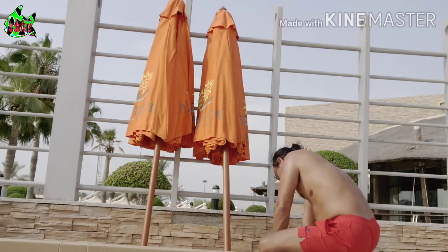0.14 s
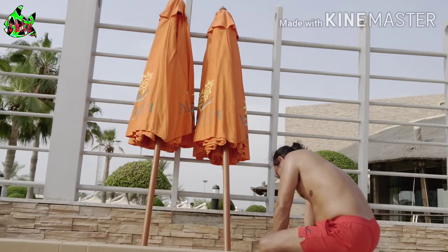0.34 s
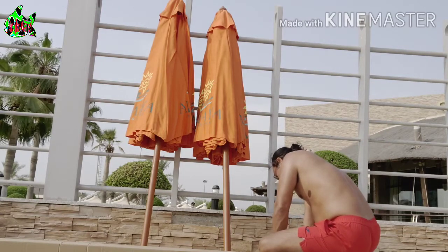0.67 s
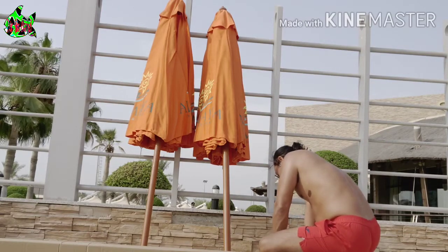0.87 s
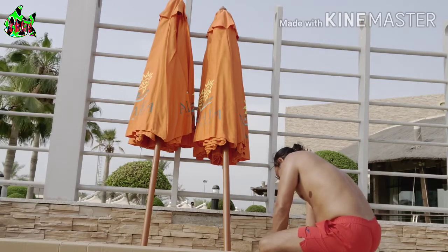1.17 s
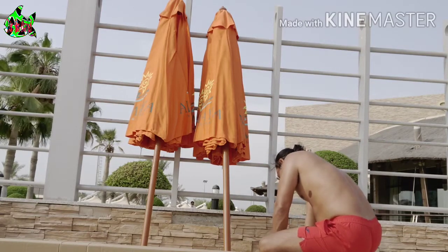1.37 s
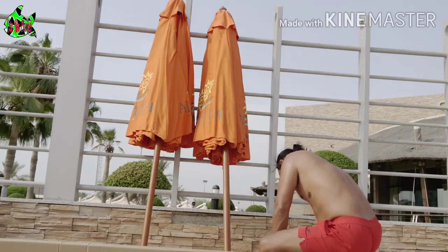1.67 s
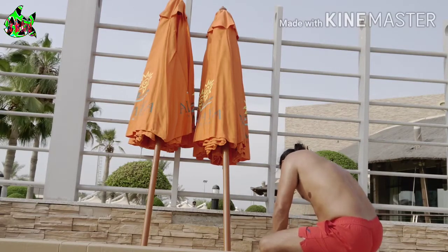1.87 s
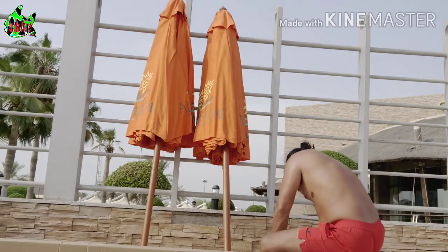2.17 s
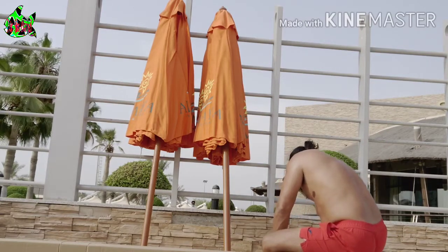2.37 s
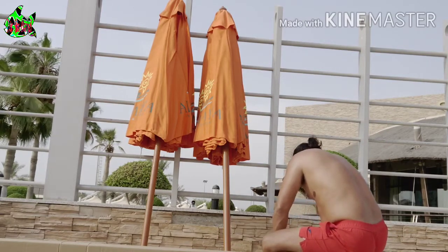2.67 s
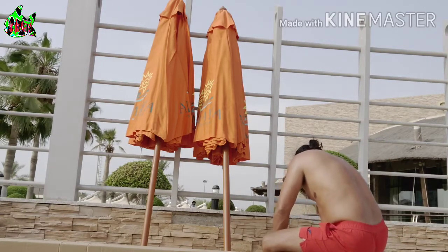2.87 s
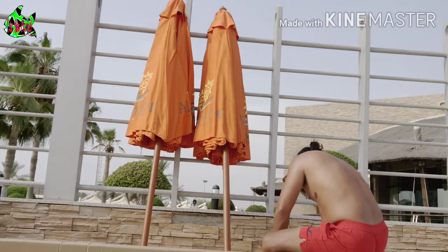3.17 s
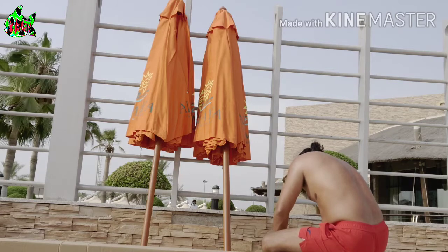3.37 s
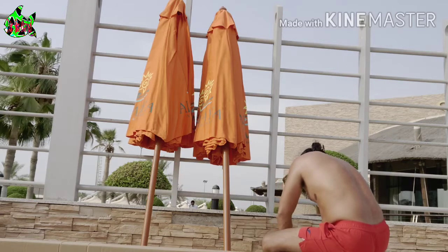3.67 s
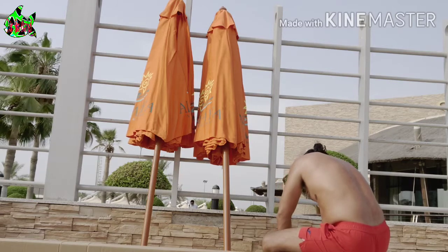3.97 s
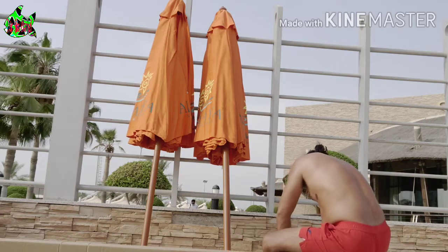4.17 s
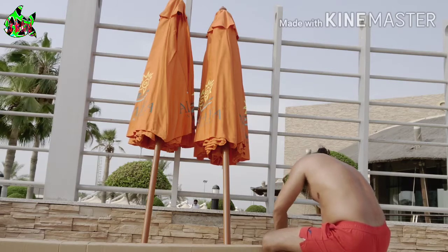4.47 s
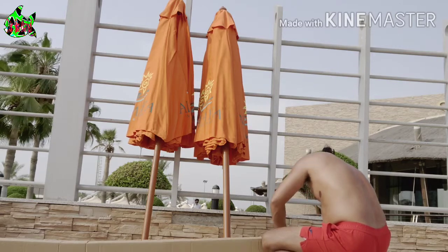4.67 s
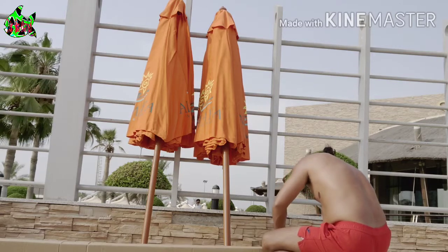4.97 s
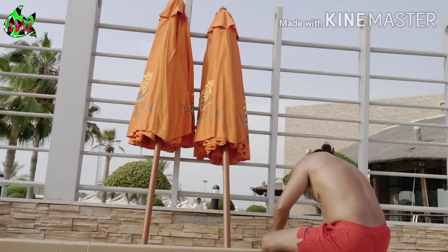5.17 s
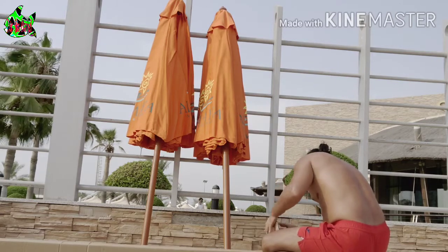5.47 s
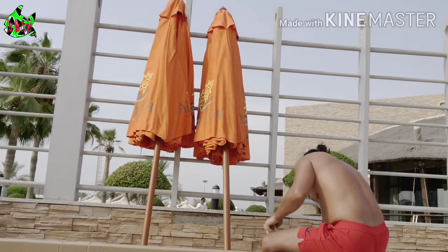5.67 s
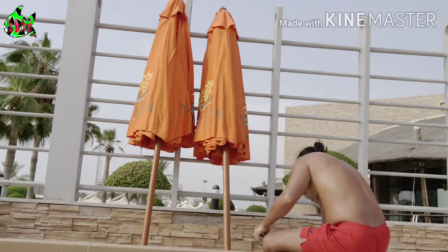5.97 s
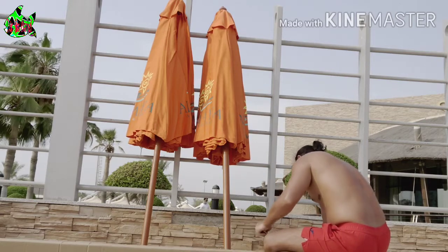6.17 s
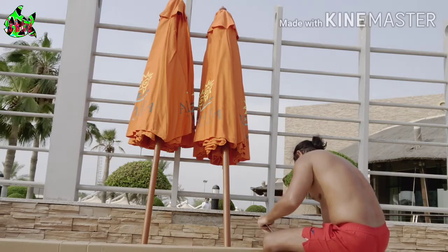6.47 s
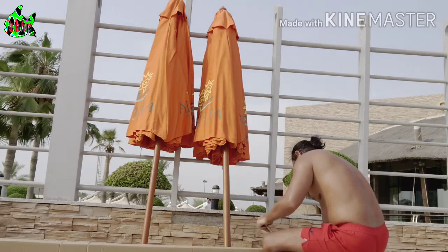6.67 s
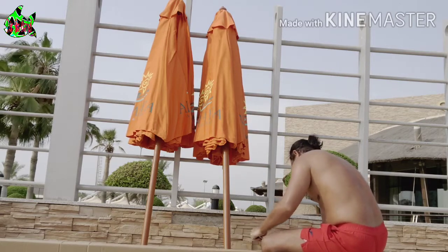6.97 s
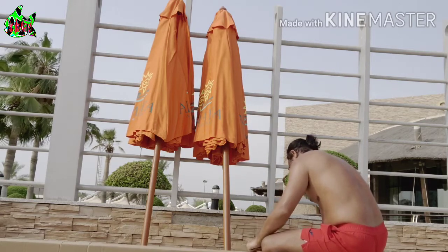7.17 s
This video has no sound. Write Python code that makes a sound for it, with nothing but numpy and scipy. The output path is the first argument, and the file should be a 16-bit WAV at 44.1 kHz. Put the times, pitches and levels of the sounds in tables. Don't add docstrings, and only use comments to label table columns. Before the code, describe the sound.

Someone handles the foot of a folded umbrella by a pool. Cloth swishes first, then a short gritty drag and a boomy hollow knock that rocks and settles at left. Small tool taps and clinks lead to a rapid run of dry stone ticks, then a woody double knock at centre. Low traffic rumble, gentle wind buffeting and faint pump hum continue throughout; the terrace returns a short, light echo.

```python
import sys
import numpy as np
from scipy import signal
from scipy.fft import rfft, irfft, dct, next_fast_len
from scipy.io import wavfile
from scipy.ndimage import uniform_filter1d

SR = 44100
rng = np.random.default_rng(int(sys.argv[2]) if len(sys.argv) > 2 else 0)


def store_wav(level_fs):
    pcm = np.round(np.clip(np.atleast_2d(level_fs), -1, 1) * 32767)
    wavfile.write(sys.argv[1], SR, pcm.T.astype(np.int16))


def invert_db(level):
    return 10 ** (np.asarray(level, dtype=float) / 20)


N = 323253
LAG_LEFT, LAG_MIDDLE, LAG_STREET = 17, -4, -15
PRE = 40


def read(points, hz):
    f, value = np.transpose(points)
    return np.interp(np.log(hz + 1), np.log(f + 1), value)


def evened(x):
    return x / np.sqrt(np.mean(x ** 2) + 1e-20)


def coloured(x, points):
    size = next_fast_len(N + 400)
    gain = invert_db(read(points, np.fft.rfftfreq(size, 1 / SR)))
    return irfft(rfft(x, size) * gain, size)[..., :N]


def band(x, lo_hz, hi_hz):
    sos = signal.butter(2, [lo_hz, min(hi_hz, SR * .49)], "band", fs=SR, output="sos")
    return signal.sosfilt(sos, x)


def slow(rate_hz):
    drift = band(rng.standard_normal(N), 0.079, rate_hz)
    return evened(signal.lfilter([1], [1, -np.exp(-2 * np.pi * rate_hz / SR)], drift))


def humps(rows):
    t = np.arange(0, N + 64, 64) / SR
    power = sum(invert_db(db) ** 2 * np.exp(-((t - s) / half) ** 4) for s, half, db in rows)
    return np.interp(np.arange(N) / SR, t, np.sqrt(power))


def placed(x, lag):
    return np.array([x, np.roll(x, lag)])


def add(mix, s, sound):
    part = mix[:, round((s - PRE / SR) * SR):][:, :sound.shape[1]]
    part += sound[:, :part.shape[1]]


def blows(rows, modes, lag, drift=0.008, quick_s=0.014, spread=.3):
    hz, mode_db, t60 = np.transpose(modes)[:, :, None]
    out, t = np.zeros((2, N)), np.arange(int(np.clip(t60.max() * SR, 1500, 9000))) / SR
    lean, spot_db = .8, 1.5
    for s, db, ms, ring_db in rows:
        spot, turn, detune = rng.standard_normal((3, len(modes), 1))
        push = np.sin(np.pi * np.minimum(t[:300] * 1000 / ms, 1)) ** 2
        fade = invert_db(mode_db + spot_db * spot - 60 * t / t60)
        phase = 2 * np.pi * hz * (1 + drift * detune) * t + lean + spread * turn
        ring = np.convolve((fade * np.cos(phase)).sum(0), push)[:len(t)]
        settle = invert_db(ring_db) + (1 - invert_db(ring_db)) * np.exp(-t / quick_s)
        sound = invert_db(db) * ring / abs(ring).max() * settle
        add(out, s, placed(np.pad(sound, PRE), lag))
    return out


def taps(rows, lag, tick_ms, scattered, size=5000, width=1.21, broad=0.99):
    out, t = np.zeros((2, N)), np.arange(size) / SR
    for s, db, hz, top_db, loose_db in rows:
        burst, left, right, shared = rng.standard_normal((4, size))
        tick = 3.5 * (t == 0) + .4 * burst * np.exp(-1000 * t / tick_ms)
        t60 = 0.076 * invert_db(0.16 * loose_db) * (1 + invert_db(loose_db) ** 2 / 4)
        fade = invert_db(min(loose_db, 0) - 60 * t / t60) * np.minimum(t / 0.00038, 1)
        tail = np.pad(scattered * np.array([left, right]) * fade, ((0, 0), (PRE, PRE)))
        drive = placed(np.pad(tick + shared * fade, PRE), lag) + tail
        body = band(drive, hz / width, hz * width) + broad * band(drive, 770, 7840)
        top = band(drive + 0.74 * tail, 9850, 16100)
        sound = body / abs(body).max() + invert_db(top_db + 4.0) * top / abs(top).max()
        add(out, s, invert_db(db) * sound)
    return out


# (time [s], peak level [dB], contact time [ms], ring level [dB])
BASE_BLOWS = [
    (1.8585, -22, 1.5, 0),
    (1.8641, -4, 0.67, -14),
    (1.87, -15, 1.04, -3),
    (1.878, -13.5, 1.1, -2),
    (1.884, -24, 0.54, -3),
    (3.412, -28, 1.9, -9),
]
# (frequency [Hz], level [dB], t60 [s])
BASE_MODES = [(76.5, 3.5, 0.047), (97, -13.5, 0.095), (219, -20, 0.14), (261, -3, 0.11), (367, 1, 0.036),
              (395, -4, 0.21), (452, 1.5, 0.07), (770, -2, 0.05), (820, -1.5, 0.06), (908, -2, 0.24),
              (1004, -4, .07), (1180, -9, 0.032), (2280, -12, 0.06), (2500, -17, 0.05)]
# (time [s], peak level [dB], contact time [ms], ring level [dB])
EDGE_BLOWS = [
    (1.8905, -17, 0.61, -10),
    (1.896, -17, 0.7, -2),
    (1.9023, -11.5, 0.83, -18),
    (1.91, -22, 0.66, -6),
    (1.921, -22, 1.5, -5),
    (1.934, -28, 0.99, -3),
    (1.946, -24, 1.6, -5),
    (1.961, -27, 0.71, -4),
    (1.981, -33, 0.85, 2),
]
# (frequency [Hz], level [dB], t60 [s])
EDGE_MODES = [(72, 2.5, 0.091), (203, -10, .1), (260, 0.5, 0.059), (344, -1.5, 0.14), (415, -5, 0.087),
              (475, -10, .08), (623, -1.5, 0.052), (680, -1.5, 0.046), (750, -12, 0.054), (870, -9, 0.053),
              (1120, -15, .05), (1370, -3, .05), (1940, -11, 0.052), (2100, -9, .04)]
# (time [s], peak level [dB], contact time [ms], ring level [dB])
PAD_BLOWS = [
    (4.5198, -20, 2.7, -6),
    (4.5272, -24, 0.93, -7),
]
# (frequency [Hz], level [dB], t60 [s])
PAD_MODES = [(184, -1.5, 0.11), (290, 2, 0.054), (684, -10, 0.046)]


def hollow_base():
    knocks = blows(BASE_BLOWS, BASE_MODES, LAG_LEFT)
    edge = blows(EDGE_BLOWS, EDGE_MODES, LAG_LEFT)
    return knocks + edge + blows(PAD_BLOWS, PAD_MODES, LAG_LEFT)


# (time [s], peak level [dB], tick pitch [Hz], top band [dB], looseness [dB])
LEFT_TAPS = [(0.1432, -46, 2900, -23, -5), (0.4274, -45.5, 2730, -19, 8), (2.2765, -31, 2630, -3, -25),
             (2.6638, -39.5, 2250, -8, 3), (2.7791, -44.5, 5000, -1, -8), (2.787, -47, 5200, -4, -4),
             (3.3797, -35, 5200, -11, -7), (3.4012, -33, 5240, -3, -26), (3.412, -26, 3360, -27, -19),
             (3.5154, -45, 2620, -1, -25), (4.5635, -51, 2980, -21, -5), (4.8024, -38, 3870, -18.5, -13),
             (4.8868, -38, 1800, -30, -14), (4.898, -29, 2270, -39, -11), (6.471, -48, 5020, 1, -18),
             (6.482, -46, 4500, -1, -19), (6.861, -47, 6200, -4, -18), (2.6603, -44, 2500, -2, -11),
             (1.1205, -42, 4000, -24, -18), (1.128, -53, 4700, -20, -16), (6.5231, -43, 3290, -4, -16),
             (6.7484, -45, 2990, -25, -15), (6.8478, -43, 2780, -29, -15), (7.119, -50, 2530, -23, -6)]
# (time [s], peak level [dB], tick pitch [Hz], top band [dB], looseness [dB])
BASE_TICKS = [
    (1.8597, -16.5, 2820, -21, -20),
    (1.8649, -31.5, 2800, -7, 8),
    (1.9027, -22, 5640, -4.5, -15.5),
    (2.276, -41, 5200, -17, -12),
    (3.413, -33.5, 1490, -28, -29),
    (4.5187, -45, 5400, -6, -15),
    (4.5303, -42, 5470, -3, -18),
    (6.848, -40, 5500, -1, -21),
]


def base_taps():
    tick_ms = .35
    ticks = taps(BASE_TICKS, LAG_LEFT, tick_ms, 1.0, size=3000, width=1.287, broad=0.17)
    return taps(LEFT_TAPS, LAG_LEFT, tick_ms, 0.99) + ticks


# (time [s], peak level [dB], contact time [ms], ring level [dB])
POLE_BLOWS = [
    (2.5235, -47, 0.26, -24),
    (4.8366, -12, 1.04, 0),
    (4.8415, -23.5, 0.74, 2),
    (4.844, -21, 0.74, -8),
    (4.8485, -26, 1.4, -2),
    (4.871, -35, 2, -16.5),
    (4.888, -28, 1.6, -2),
    (5.66, -40, 0.32, -28),
]
# (frequency [Hz], level [dB], t60 [s])
POLE_MODES = [(121, -6, 0.13), (196, -8, 0.2), (234, -8, 0.16), (303, 1, 0.11), (393, -2.5, 0.077),
              (491, 6, 0.048), (606, -3, 0.041), (887, 2, 0.044), (1040, -29, .04), (1470, -2, 0.046),
              (1740, -8, 0.04), (1970, -21, 0.046), (2730, -1, .05), (3240, -6, 0.069)]


def pole():
    return blows(POLE_BLOWS, POLE_MODES, LAG_MIDDLE)


# (time [s], peak level [dB], tick pitch [Hz], top band [dB], looseness [dB])
TOOL_TAPS = [(1.1196, -52, 1610, -22, -3), (1.7525, -38.5, 1200, -7, 13.5),
             (2.5229, -24.5, 2550, -2, -15.5), (2.5295, -29, 2900, -12, -8), (2.8125, -50, 1780, 1, -16),
             (3.118, -48, 1500, -1, -6), (3.129, -52, 1500, 5, -5), (3.925, -41, 1530, -14, -11),
             (4.0864, -45.5, 1680, -6, 6), (4.619, -51, 1500, -20, -2), (4.8365, -23.5, 5200, -7.5, -6.5),
             (4.844, -21.5, 3300, -14, -11), (4.974, -41.5, 2260, -5.5, 5.5), (5.347, -48, 2130, -24, 6),
             (5.659, -40, 1600, -7, -20), (5.6695, -45, 4500, -9, -7), (5.7992, -48.5, 1620, -7, 5),
             (5.9974, -54, 1520, -22, -4), (6.41, -47, 2120, -23, -4)]
# (time [s], peak level [dB], tick pitch [Hz], top band [dB])
CHATTER_TICKS = [(3.5353, -34, 3000, 1), (3.5466, -28, 1900, -7), (3.553, -27, 4540, -13),
                 (3.5672, -25, 2500, -2), (3.575, -24.5, 4020, -11), (3.577, -24, 1700, -13),
                 (3.5855, -23, 2780, -2.5), (3.586, -22, 1810, -14), (3.5918, -18, 5000, -3.5),
                 (3.5937, -25, 1270, -13), (3.596, -23, 2020, -3), (3.602, -18, 4300, -10),
                 (3.6046, -19.5, 4000, -11), (3.6046, -40, 3100, -9), (3.608, -23, 2400, -14),
                 (3.6116, -24, 5500, -5), (3.6132, -18.5, 4320, -9), (3.617, -28, 2520, -10),
                 (3.621, -26, 3500, -4), (3.623, -35, 5000, -11), (3.628, -33, 4500, -10),
                 (3.633, -35, 2500, -5), (3.639, -33, 3800, -6), (3.647, -39, 2200, -3),
                 (3.655, -41, 1800, 0), (3.66, -34, 3500, -3), (3.667, -30, 2600, -6),
                 (3.671, -40, 1100, -8), (3.675, -31, 4200, -10), (3.684, -35, 3000, -5),
                 (3.69, -40, 2000, -5), (3.679, -34, 1100, -13)]


def tool_taps():
    chatter = [(*row, -20) for row in CHATTER_TICKS]
    run = taps(chatter, LAG_MIDDLE, 0.28, 1.0, size=1500, width=1.3, broad=1.0)
    return (taps(TOOL_TAPS, LAG_MIDDLE, 0.24, 1.0) + run) * invert_db([[-1.5], [1.5]])


# (time [s], peak level [dB], contact time [ms], ring level [dB])
CLASP_CLINKS = [(.1432, -40, 0.13, -3), (1.9028, -22, 0.19, -6), (2.2764, -41, 0.11, -5),
                (2.6645, -46, 0.16, -5), (3.38, -31.5, 0.11, 1), (3.389, -53, .15, -5),
                (3.4011, -33, 0.09, -9), (3.4119, -33, .2, -2), (4.865, -35, 0.39, -6),
                (4.888, -37, 0.4, -3), (4.8985, -30, 0.25, -9), (6.849, -36.5, 0.11, -10)]
# (frequency [Hz], level [dB], t60 [s])
CLASP_MODES = [(1350, 8, 0.015), (1790, 5.5, 0.014), (3100, -3, .015), (3600, 0, 0.018), (4200, -9, .015),
               (5260, -0.5, 0.012), (5690, 1.5, 0.013), (7100, -13, .012)]
# (time [s], peak level [dB], contact time [ms], ring level [dB])
TOOL_CLINKS = [(1.1198, -39, 0.54, -4), (1.752, -36, 0.51, -10), (2.5228, -29.5, .2, -18),
               (2.5252, -22.5, 0.12, -26), (2.5295, -29, 0.094, -8), (2.539, -45, 0.26, -8),
               (3.5848, -23, 0.087, -29), (4.09, -41, 0.3, -8), (4.8364, -18, 0.17, -11),
               (4.844, -14.5, 0.23, -7), (4.8525, -32, 0.18, -5), (5.66, -33, 0.57, -8),
               (5.8, -39, 0.99, -7)]
# (frequency [Hz], level [dB], t60 [s])
TOOL_MODES = [(590, 3, 0.035), (980, -8, 0.03), (1356, 1, 0.011), (1580, -6, 0.072), (2500, 4.5, 0.014),
              (2900, 0.5, 0.028), (3300, -17, 0.03), (3850, 4.5, 0.018), (4300, 3.5, 0.024),
              (5400, -17, 0.023), (5700, -29, 0.012), (6600, 3.5, 0.019)]


def clinks():
    scatter = 2.5
    clasp = blows(CLASP_CLINKS, CLASP_MODES, LAG_LEFT, .012, 0.0027, scatter)
    return clasp + blows(TOOL_CLINKS, TOOL_MODES, LAG_MIDDLE, 0.022, 0.0017, scatter)


# (time [s], peak level [dB], pitch [Hz], t60 [s])
PEBBLE_SQUEAKS = [(1.49, -53, 1140, .04), (1.51, -48, 1730, 0.061), (1.53, -49, 1420, .05),
                  (1.545, -39.5, 945, .03), (1.553, -49, 1880, .04), (1.568, -52, 1690, .04),
                  (1.592, -52, 1820, .03), (1.707, -46.5, 2220, .03), (1.75, -40.5, 1097, 0.041),
                  (1.768, -45, 3300, .03), (1.784, -47, 2420, .04), (1.794, -46, 2170, 0.041),
                  (1.812, -56, 2010, 0.043), (1.83, -50, 2000, .04), (1.905, -32, 2970, .02),
                  (2.53, -52, 2900, 0.042), (2.538, -48, 2780, 0.047), (2.5225, -31.5, 1305, 0.027),
                  (2.523, -36, 1740, .025), (2.531, -38, 5400, .03), (2.664, -47, 2100, 0.016),
                  (2.666, -42, 4340, .04), (4.853, -35, 2780, 0.024), (4.864, -37, 1900, 0.028)]


def pebbles():
    out, t = np.zeros((2, N)), np.arange(4000) / SR
    rise_s = 0.0015
    for s, db, hz, t60 in PEBBLE_SQUEAKS:
        turn, near = rng.random(2)
        neighbour = np.sin(2 * np.pi * (hz * (1.5 + 0.071 * near) * t + turn))
        tone = np.sin(2 * np.pi * hz * t) + 0.65 * neighbour
        tone = invert_db(db - 60 * t / t60) * (1 - np.exp(-t / rise_s)) * tone
        add(out, s, placed(np.pad(tone, PRE), LAG_MIDDLE))
    return out


# (frequency [Hz], level [dB])
GRIT_COLOUR = [(400, -20), (900, -1), (1600, -1.5), (2400, -3), (3600, -1), (5000, -9), (6500, -9.5),
               (9000, -7)]


def grit(per_s, spread_db):
    hits = rng.standard_normal(N) * (rng.random(N) < per_s / SR)
    sizes = invert_db(spread_db * np.minimum(rng.exponential(1, N), 4))
    return evened(coloured(hits * sizes, GRIT_COLOUR))


def top_hiss(db):
    return invert_db(db) * evened(band(rng.standard_normal((2, N)), 5900, 18400))


def resonate(x, hz, width_hz):
    turn = np.exp(2j * np.pi * np.cumsum(hz) / SR)
    r = np.exp(-np.pi * width_hz / SR)
    return 2 * (turn * signal.lfilter([1 - r], [1, -r], x / turn)).real


# (start [s], length [s], level [dB], grit resonance [Hz], top band [dB])
SCRAPE_STROKES = [
    (1.462, 0.18, -55.5, 1600, -4),
    (1.747, 0.044, -58, 1160, -16),
    (1.75, 0.18, -59, 2140, 3.5),
    (3.51, 0.2, -52.5, 1900, 2.5),
    (3.572, 0.061, -45.5, 4140, 0),
    (3.654, 0.047, -48, 1030, -3),
    (3.895, 0.055, -63.5, 4600, 8.5),
    (4.791, 0.023, -60, 4100, 0),
    (6.386, 0.063, -65.5, 4200, -5),
]


def scrapes():
    t = np.arange(0, N + 16, 16) / SR
    db, top_db, hz, ring = np.full((4, len(t)), -200.)
    for s, length, peak_db, grit_hz, fine_db in SCRAPE_STROKES:
        shape = np.interp((t - s) / length, [0, 0.32, 1], [1, 0, 1], 9, 9)
        press_db = peak_db - 13.5 * shape ** 2.1
        lead = press_db > db
        db = np.where(lead, press_db, db)
        top_db = np.where(lead, fine_db, top_db)
        hz = np.where(lead, grit_hz, hz)
        ring = np.where(lead, min(0.72 * invert_db(-0.55 * (peak_db + 62)), 3), ring)
    db, top_db, hz, ring = np.repeat([db, top_db, hz, ring], 16, 1)[:, :N]
    db, hz, ring = db + 2 * slow(69), abs(hz), ring.clip(0)
    around = np.array([grit(4000, 2.8), grit(4000, 2.8)])
    body = placed(grit(2500, 3.8), LAG_MIDDLE) + .9 * around
    ringing = evened(resonate(resonate(body, hz, 900), hz, 900))
    body = (body + ring * ringing) / np.sqrt(1 + ring ** 2)
    return invert_db(db) * body + top_hiss(db + top_db + 1.0)


# (time [s], level [dB])
HAND_RUSTLE = [(0.0, -60.5), (0.25, -62.5), (0.5, -59.5), (0.9, -63.5), (1.28, -60), (1.4, -60.5),
               (1.59, -61.5), (1.98, -53.5), (2.28, -60.5), (2.49, -65.5), (2.76, -62.5), (3.06, -65),
               (3.4, -62), (3.76, -63), (4.5, -67.5), (5.35, -63), (6.1, -68), (7.33, -67.5)]
# (middle [s], half length [s], level [dB])
CLOTH_SWISHES = [
    (.1, 0.16, -69),
    (.5, 0.21, -59),
    (1.27, 0.15, -57),
    (1.6, 0.13, -63),
    (2.15, .2, -74),
    (3.03, 0.056, -69),
    (5.25, 0.074, -70),
]
# (middle [s], half length [s], level [dB])
WEAVE_DRAGS = [
    (.45, 0.3, -74),
    (1.12, 0.33, -73),
    (2.06, 0.13, -74),
    (2.73, .04, -80),
]


def rustle():
    t = np.arange(N) / SR
    busy_s, busy_db = np.transpose(HAND_RUSTLE)
    db = np.interp(t, busy_s, busy_db)
    left = np.where(t < 2.45, 0.7, 0.28)
    around = np.array([grit(9000, 2.3), grit(9000, 0.64)])
    body = left * placed(grit(6000, 0.97), LAG_LEFT) + np.sqrt(1 - left ** 2) * around
    flicker_db = 2.0 * slow(11.0)
    fine = np.hypot(invert_db(-90.5 + 0.24 * (db + 69)), humps(CLOTH_SWISHES))
    weave = humps(WEAVE_DRAGS) * evened(band(body, 4200, 5160))
    hiss = fine * top_hiss(flicker_db) * invert_db([[1.5], [-1.5]])
    return invert_db(db + 2.5 + flicker_db) * body + weave + hiss


def terrace(x, t60, gap_ms):
    t = np.arange(SR // 2) / SR
    echoes = rng.choice([-1., 1.], (2, len(t))) * (rng.random((2, len(t))) < .05)
    tail = echoes * invert_db(-60 * t / t60) * (t > gap_ms / 1000)
    return signal.fftconvolve(x, tail / np.linalg.norm(tail[0]), axes=1)[:, :N]


# (frequency [Hz], level [dB per Hz])
TRAFFIC_MID = [(15, -60), (25, -3), (48, -4.5), (75, -1.5), (133, -9.5), (160, -9.5), (429, -18.5),
               (460, -20.5), (592, -25.5), (649, -26.5), (711, -28), (1180, -38), (6000, -59.5),
               (7800, -104), (13200, -120)]
# (frequency [Hz], level [dB per Hz])
TRAFFIC_SIDE = [(15, -41), (25, -22), (64, -5), (133, -14.5), (383, -17), (800, -20.5), (1100, -25.5),
                (2000, -35), (6000, -59), (7800, -56), (13200, -120)]


def rumble(gust):
    mid = invert_db(-40) * evened(coloured(rng.standard_normal(N), TRAFFIC_MID))
    side = invert_db(-51.5) * evened(coloured(rng.standard_normal(N), TRAFFIC_SIDE))
    swell = (gust / invert_db(-58.0)) ** 0.23
    mid = mid + (swell - 1) * band(mid, 41, 236)
    street = evened(coloured(rng.standard_normal(N), TRAFFIC_SIDE))
    return np.array([mid + side, mid - side]) + invert_db(-54) * placed(street, LAG_STREET)


# (peak [s], half length [s], level [dB])
WIND_GUSTS = [
    (0, 0.21, -45),
    (1.57, 0.24, -42),
    (2.26, 0.15, -55),
    (3.1, 0.19, -47),
    (3.75, 0.22, -48),
    (4.2, 0.12, -41.5),
    (5.35, 0.088, -45),
    (5.75, 0.58, -42.5),
    (7.33, 0.26, -53),
]


def gusts():
    return np.hypot(invert_db(-57.5), humps(WIND_GUSTS))


def wind(gust):
    lumps = np.array([invert_db(2.0 * slow(6.5)), invert_db(0.73 * slow(6.2))])
    air = band(band(rng.standard_normal((2, N)), 49.0, 88), 21, 260)
    return gust * evened(lumps * air)


# (frequency [Hz], level [dB])
PUMP_HUM = [(64.6, -45.5), (129.2, -46.5)]


def pump():
    speed = np.cumsum(1 + 0.011 * slow(2.5)) / SR
    low = sum(invert_db(db + 1.55 * slow(2.04)) * np.sin(2 * np.pi * hz * speed) for hz, db in PUMP_HUM)
    whine = invert_db(-65) * np.sin(2 * np.pi * 866.7 * np.arange(N) / SR)
    return low + placed(whine, LAG_STREET)


def scene():
    hits = hollow_base() + base_taps() + pole() + tool_taps() + clinks() + pebbles()
    echoes = invert_db(-13.5) * terrace(hits, 0.54, 3.6)
    gust = gusts()
    return hits + echoes + scrapes() + rustle() + rumble(gust) + wind(gust) + pump()


# (frequency [Hz], level [dB])
LINE_FLOOR = [(700, -32), (1400, -22), (4700, -17), (5700, -11), (6900, -2), (7800, 2), (8700, 6),
              (8950, 14), (9350, 14), (9500, -4.5), (16000, -4.5)]


def thinned(x):
    count, lead_in = N // 1024 + 2, 731
    window = signal.windows.kaiser_bessel_derived(2048, 4 * np.pi)
    pair = np.pad([x[0] + x[1], x[0] - x[1]], ((0, 0), (lead_in, 4096)))
    spans = np.arange(count)[:, None] * 1024 + np.arange(2048)
    a, b, c, d = np.split(pair[:, spans] * window, 4, 2)
    z = dct(np.dstack([-c[..., ::-1] - d, a - b[..., ::-1]]), 4, norm="ortho")
    local = np.sqrt(uniform_filter1d(z ** 2, size=33, axis=2).clip(0))
    usual = np.median(local, 1, keepdims=True)
    local[..., :440] = np.sqrt(local * usual)[..., :440]
    patches_db = 3 * rng.standard_normal((2, count // 2 + 1, 64))
    patches_db = patches_db.repeat(16, 2).repeat(2, 1)[:, :count]
    keep = abs(z) > local * invert_db(read(LINE_FLOOR, np.arange(1024) * SR / 2048) + patches_db)
    treble = (z[..., 100:300] ** 2).sum((0, 2))
    sudden = treble > 3.5 * np.minimum(np.roll(treble, 1), np.roll(treble, 2))
    outside_gap = abs(np.arange(1024) - 405) > 30
    keep = keep | (sudden[:, None] & outside_gap)
    p, q = np.split(dct(z * keep, 4, norm="ortho"), 2, 2)
    early = np.dstack([q, -q[..., ::-1]]) * window[:1024]
    late = np.dstack([-p[..., ::-1], -p]) * window[1024:]
    joined = (early + np.roll(late, 1, 1)).reshape(2, -1)
    mid, side = joined[:, lead_in:lead_in + N] / 2
    return np.array([mid + side, mid - side])


def low_pass(x):
    return signal.sosfilt(signal.butter(12, 16500, fs=SR, output="sos"), x)


# (frequency [Hz], level [dB])
TONE_COLOUR = [(15, -60), (30, -17), (50, -0.21), (6000, 3.5), (7200, -2), (8200, -10.5), (8800, -9.5),
               (9250, -7.5), (9500, -7.5), (10200, -3.5), (15300, -4.5), (15800, -32), (16500, -45),
               (16800, -90)]


def record(dry):
    heard = coloured(np.pad(dry, ((0, 0), (0, 400)), "reflect"), TONE_COLOUR)
    finished = thinned(heard)
    return low_pass(finished)


dry = scene()
out = record(dry)
store_wav(out)
```